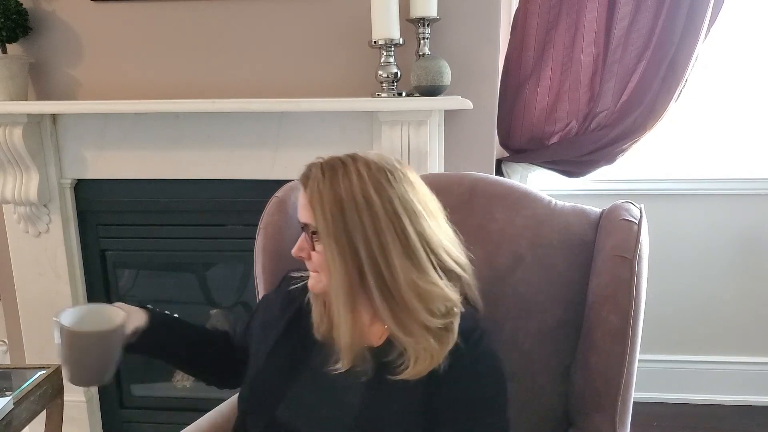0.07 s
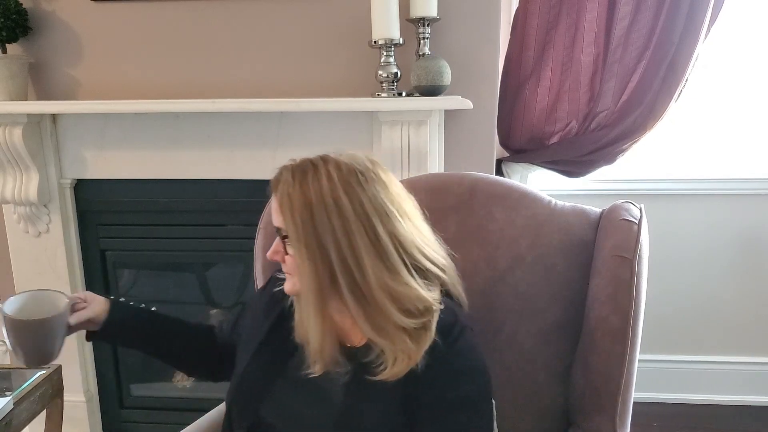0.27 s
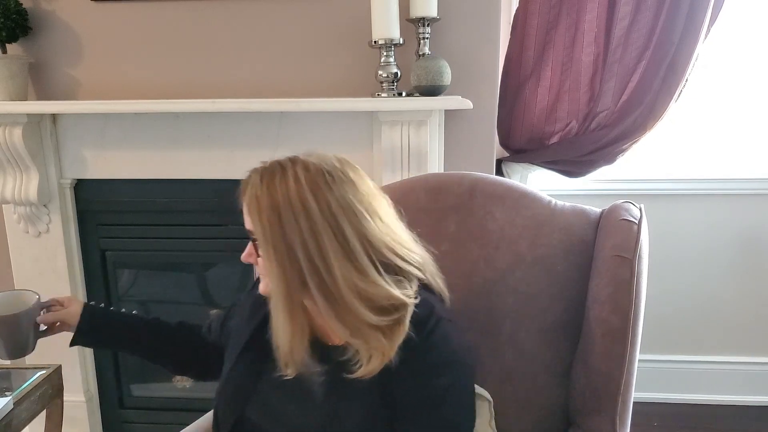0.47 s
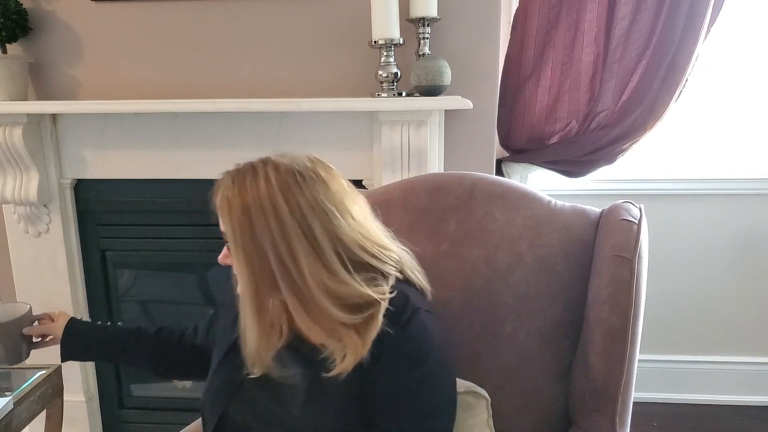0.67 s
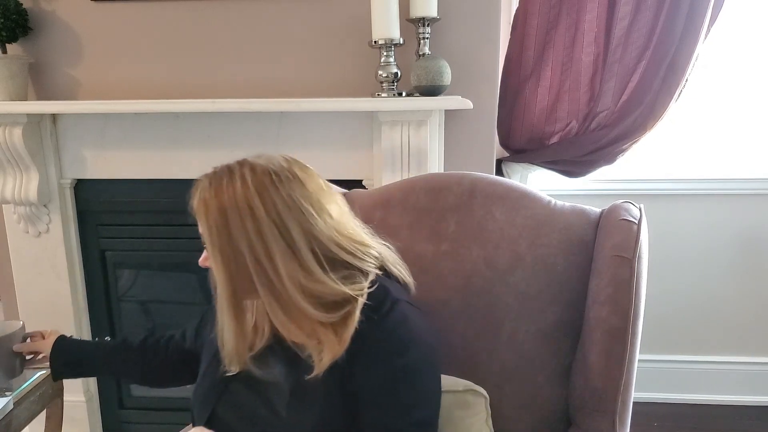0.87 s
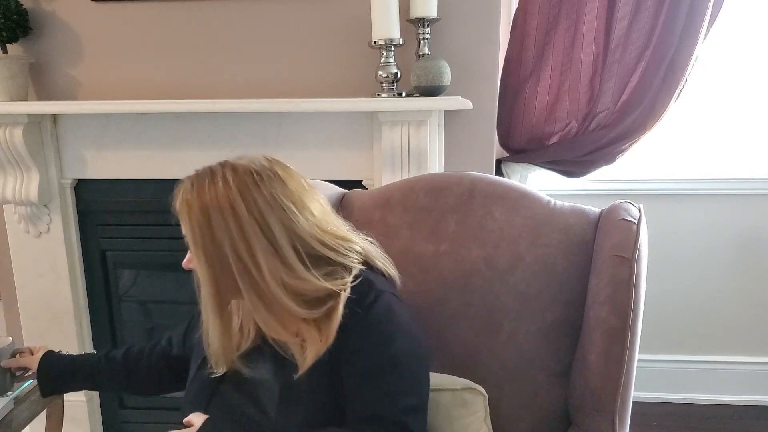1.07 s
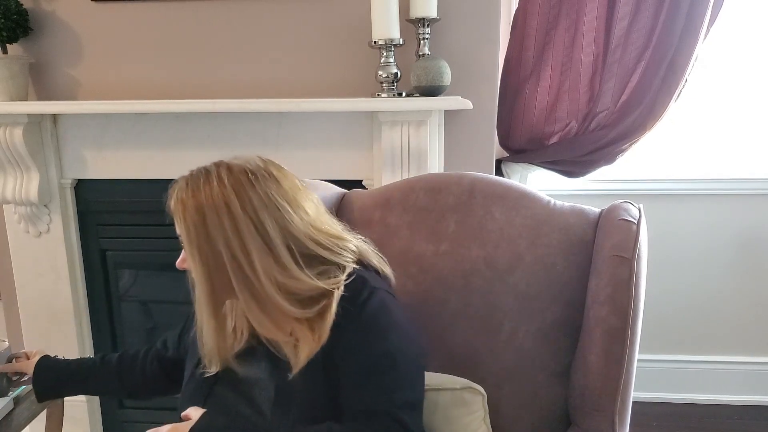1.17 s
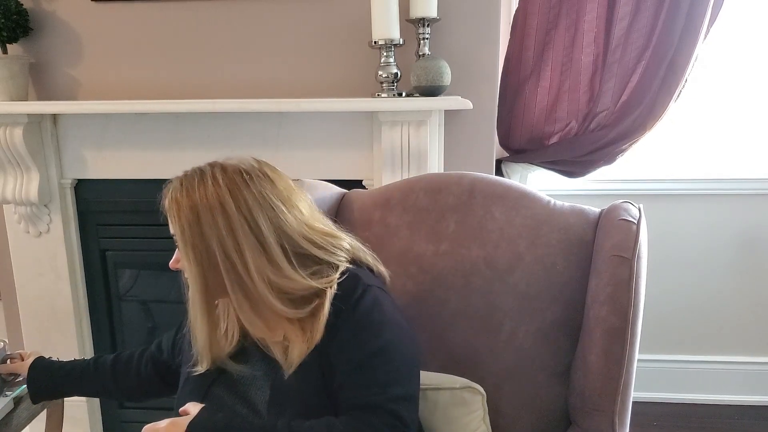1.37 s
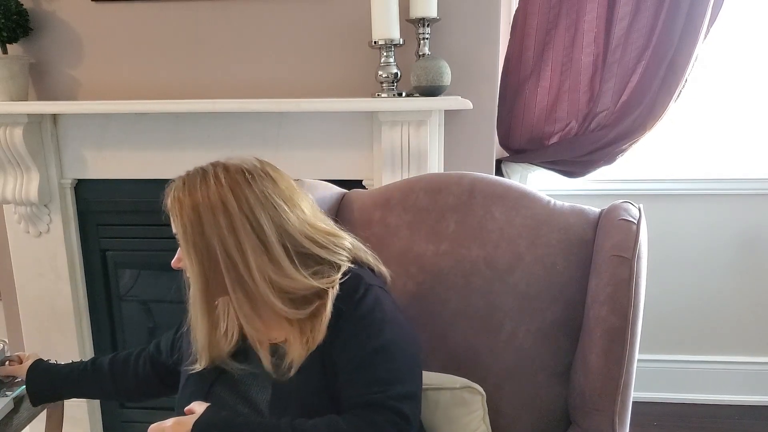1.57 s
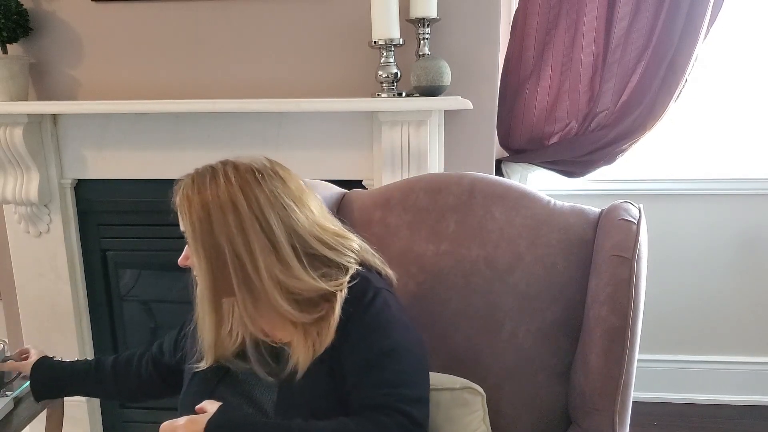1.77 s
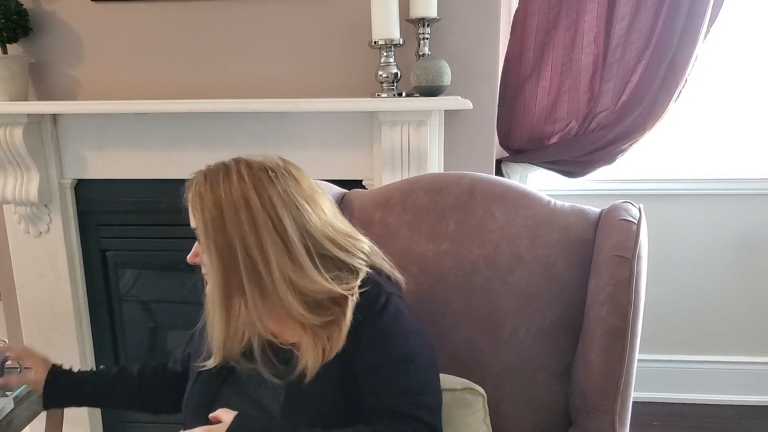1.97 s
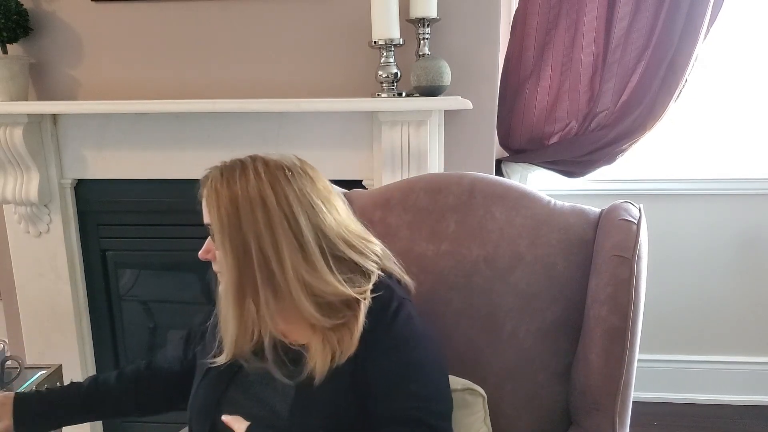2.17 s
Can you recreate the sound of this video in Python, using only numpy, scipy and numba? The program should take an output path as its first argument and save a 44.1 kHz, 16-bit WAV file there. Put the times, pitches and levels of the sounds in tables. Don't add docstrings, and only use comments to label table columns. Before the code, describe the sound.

A ceramic mug is set down on a glass table, one sharp knock then a softer one

```python
import sys
import numpy as np
from scipy import signal
from scipy.fft import rfft, irfft
from scipy.io import wavfile
from scipy.ndimage import uniform_filter1d
from numba import njit

SR = 44100
rng = np.random.default_rng(int(sys.argv[2]) if len(sys.argv) > 2 else 0)


def amplitude_ratio(level_db):
    exponent = np.asarray(level_db, float) / 20
    return 10 ** exponent


def digitize_waveform(pressure):
    field = np.atleast_2d(pressure).T
    bounded = np.clip(field, -1, 1)
    quanta = np.round(bounded * 32767).astype(np.int16)
    wavfile.write(sys.argv[1], SR, quanta)


N = 97152

# t/s, level/dB, crack tilt/(dB/octave), room fill time/s, decay factor/1
LANDINGS = [
    (1.2144, -3.5, 2, 0.04, 1.094),
    (1.6259, -17, 0.5, 0.031, 1.01),
]
# f/Hz, level/dB, T60/s
FIRST_MODES = [(477.6, -4, 0.74), (736, -12, 0.2), (881, -16, .35), (1162, -3.5, 0.37), (1305, -12.5, .6),
               (1687, -22, 0.19), (1920, -12.5, 0.3), (1990, -0.5, 0.31), (2314, -4.5, 0.31),
               (2563, -11.5, 0.26), (2930, -10, .25), (3239, -11, 0.33), (3340, -17.5, .28),
               (4176, -13.5, 0.47)]
# f/Hz, level/dB, T60/s
SECOND_MODES = [(497, 3.5, 0.47), (875, -7, 0.56), (1017, -1, 0.4), (1274, -7, 0.61), (1606, -15, 0.52),
                (1895, -4, 0.43), (2027, -7.5, 0.41), (2300, -8, .3), (2988, -27, 0.18), (3290, -16, 0.27),
                (3620, -7, .23), (4430, -18, 0.41), (6072, -20, 0.35)]
RING_LEVELS_DB = [-6.5, -8.5]
CLACK_LEVELS_DB = [-1, -6]
# f/Hz, level/dB, T60/s
CLACK_MODES = [(694, -6, 0.055), (1950, -11, .03), (2830, -3, .045), (3500, -9.5, 0.044),
               (5454, -14, 0.055), (9400, -31.5, .05), (11600, -34, .08), (12700, -36.5, .07)]
# f/Hz, level/dB, T60/s
THUD_MODES = [(50, -29, 0.74), (70.7, -16.5, 0.49), (172.2, -14.5, 0.38), (211.5, -18, 0.4),
              (365.3, -12, 0.43)]
# f/Hz, density/(dB per Hz)
CRACK_SPECTRUM = [(35, -46), (75, -16.5), (110, -22), (216, -13.5), (489, -5.5), (1400, -14.5),
                  (3100, -13.5), (6000, -33), (12500, -50), (15800, -77)]
# f/Hz, T60/s
ROOM_DECAY = [(100, 0.69), (500, 0.47), (1500, 0.53), (3500, 0.35), (7000, 0.31), (14000, 0.25)]
# delay/s, level/dB, left-right/dB
REFLECTIONS = [
    (0, -3, -5.5),
    (.0045, -13, 17.5),
    (.011, -15.5, 1),
    (.024, -19.5, -13.5),
]
# f/Hz, correlation/1
PORT_COHERENCE = [(60, 0.8), (150, 0.84), (300, .7), (600, 0.5), (1200, -.1), (3000, 0), (15000, 0)]
# t/s, level/dB, f/Hz, T60/s
RUSTLES = [
    (0, -67, 3500, 0.67),
    (.508, -64, 4200, 0.035),
]
# t/s, level/dB
DRONE_LEVEL = [
    (0, -62),
    (.15, -60),
    (.45, -70),
    (.65, -64.5),
    (.8, -93),
    (1.2, -92),
    (2.2, -94.5),
]
# f/Hz, width/Hz, level/dB
DRONE_RESONANCES = [(263, 91, -13), (458, 92, 4), (528, 90, 9), (730, 100, -1.5)]
# f/Hz, density/(dB per Hz)
HOUSE_SPECTRUM = [(20, -23), (70, -1), (215, -7.5), (560, -12.5), (900, -23), (1500, -24.5), (5500, -32.5),
                  (15800, -37)]
# t/s, level/dB
HOUSE_LEVEL = [
    (0, 1),
    (.8, 1.5),
    (1.2, -1),
    (1.9, -0.5),
    (2.2, -4),
]
# f/Hz, start t/s, level/dB
APPLIANCE_TONE = (850, 1.75, -73)

CONTACT_S = 0.0011
LEFT_RIGHT = np.array([[.5], [-.5]])


def knock(tilt_db_per_octave, fill_s, decay_factor, modes, ring_db, clack_db):
    port_lag_s, early_t60_s, early_db = 0.00024, .02, -4
    thud_late_s, sag_db_per_s2 = 0.04, 59
    t = np.arange(SR) / SR
    port_t = np.array([t, t - port_lag_s])
    early = 0
    for delay_s, db, pan_db in REFLECTIONS:
        early = early + amplitude_ratio(db + pan_db * LEFT_RIGHT) * fade(port_t - delay_s, early_t60_s)
    early = amplitude_ratio(early_db) * early

    noise_bands = list(bands(SR, CRACK_SPECTRUM))
    rms = np.sqrt(np.mean(sum(noise for _, noise in noise_bands) ** 2))
    crack = 0
    for hz, noise in noise_bands:
        tail = (1 - np.exp(-t / fill_s)) * fade(t, decay_factor * curve(hz, ROOM_DECAY))
        envelope = tail + early * min(hz / 700, 1)
        crack = crack + amplitude_ratio(tilt_db_per_octave * np.log2(hz / 1000)) * noise / rms * envelope
    crack = crack * (1 - np.exp(-t / CONTACT_S))

    ring = amplitude_ratio(ring_db) * rings(t, modes, rise_s=0.017, spread_rad=1.44)
    thud = rings(t, THUD_MODES, rise_s=0.036, spread_rad=.2)
    thud = thud * (1 - np.exp(-(t / thud_late_s) ** 2))
    return (crack + ring + thud) * amplitude_ratio(-sag_db_per_s2 * t ** 2) + amplitude_ratio(clack_db) * clack(port_t)


def clack(port_t):
    partials = 0
    for hz, db, t60_s in CLACK_MODES:
        partials = partials + amplitude_ratio(db) * fade(port_t, t60_s) * np.sin(2 * np.pi * hz * port_t)
    return partials * (1 - np.exp(-np.maximum(port_t, 0) / CONTACT_S))


def rings(t, modes, rise_s, spread_rad):
    wobble_db = 2
    out = 0
    for hz, db, t60_s in modes:
        phase = 2 * np.pi * rng.random() + spread_rad * rng.standard_normal() * LEFT_RIGHT
        envelope = amplitude_ratio(db + wobble_db * walk(25, len(t))) * fade(t, t60_s)
        out = out + envelope * (1 - np.exp(-t / rise_s)) * np.sin(2 * np.pi * hz * t + phase)
    return out


def rustle(t):
    out = 0
    for start_s, db, hz, t60_s in RUSTLES:
        noise = band(rng.standard_normal((2, N)), hz, 1.1 * hz)
        out = out + level(noise, db) * fade(t - start_s, t60_s)
    return out


def drone(t):
    noise = irfft(pair(N), N)
    out = 0
    for hz, width_hz, db in DRONE_RESONANCES:
        peak = band(band(noise, hz, width_hz), hz, width_hz)
        out = out + level(peak, db) * amplitude_ratio(3 * walk(12, N))
    return level(out, 0) * amplitude_ratio(np.interp(t, *np.array(DRONE_LEVEL).T))


def house(t):
    sensor_hz, sensor_width_hz, sensor_db, house_db = 8750, 900, -21.5, -63
    hum = 0
    for hz, noise in bands(N, HOUSE_SPECTRUM):
        hum = hum + noise * amplitude_ratio(1.5 * min(300 / hz, 1) * walk(8, N))
    sensor = band(rng.standard_normal((2, N)), sensor_hz, sensor_width_hz)
    sensor = band(sensor, sensor_hz, sensor_width_hz)
    floor = level(level(hum, 0) + level(sensor, sensor_db), house_db)
    floor = floor * amplitude_ratio(np.interp(t, *np.array(HOUSE_LEVEL).T))

    hz, start_s, db = APPLIANCE_TONE
    tone = amplitude_ratio(db + 3.9 * walk(10.9, N)) * np.sin(2 * np.pi * hz * t)
    return floor + tone * np.clip((t - start_s) / .1, 0, 1)


def bands(size, spectrum):
    hz = np.fft.rfftfreq(size, 1 / SR)
    coloured = pair(size) * amplitude_ratio(curve(hz, spectrum))
    for k in range(20):
        offset = np.clip(2 * np.log2(np.maximum(hz, 1) / 25) - k, -1, 1)
        yield 25 * 2 ** (k / 2), irfft(coloured * np.cos(np.pi / 2 * offset) ** 2, size)


def pair(size):
    coherence = curve(np.fft.rfftfreq(size, 1 / SR), PORT_COHERENCE)
    mid, side = rfft(rng.standard_normal((2, size)))
    mid = mid * np.sqrt(1 + coherence)
    side = side * np.sqrt(1 - coherence)
    return np.array([mid + side, mid - side]) / np.sqrt(2)


def band(x, hz, width_hz):
    return signal.lfilter(*signal.iirpeak(hz, hz / width_hz, fs=SR), x)


def curve(hz, table):
    table = np.array(table)
    return np.interp(np.log(np.maximum(hz, 1)), np.log(table[:, 0]), table[:, 1])


def level(x, db):
    return x * amplitude_ratio(db) / np.sqrt(np.mean(x ** 2))


def fade(t, t60_s):
    return (t >= 0) * amplitude_ratio(-60 * np.maximum(t, 0) / t60_s)


def walk(rate_hz, size):
    hold = int(SR / rate_hz)
    steps = np.repeat(rng.standard_normal(size // hold + 1), hold)
    return 1.2 * uniform_filter1d(uniform_filter1d(steps, hold), hold)[:size]


def scene():
    left_db = 0.7
    t = np.arange(N) / SR
    out = house(t) + drone(t) + rustle(t)
    mode_sets = (FIRST_MODES, SECOND_MODES)
    for landing, modes, ring_db, clack_db in zip(LANDINGS, mode_sets, RING_LEVELS_DB, CLACK_LEVELS_DB):
        start_s, db, tilt_db_per_octave, fill_s, decay_factor = landing
        i = int(start_s * SR)
        sound = knock(tilt_db_per_octave, fill_s, decay_factor, modes, ring_db, clack_db)
        out[:, i:i + SR] += amplitude_ratio(db) * sound[:, :N - i]
    return out * amplitude_ratio(left_db * LEFT_RIGHT)


@njit
def follow(x, up, down):
    e, out = 1e-6, np.empty(len(x))
    for i in range(len(x)):
        e += (x[i] - e) * (up if x[i] > e else down)
        out[i] = e
    return out


def band_limit(x):
    return signal.sosfilt(signal.butter(12, 15990, fs=SR, output="sos"), x)


def record(dry):
    limit_db, ratio, attack_s, release_s = -14.5, 1.3, 0.0027, 0.053
    envelope = follow(np.abs(dry).max(axis=0), 1 / (attack_s * SR), 1 / (release_s * SR))
    gain = np.minimum(amplitude_ratio(limit_db) / envelope, 1) ** (1 - 1 / ratio)
    mix = dry * gain * amplitude_ratio(-0.5)
    return band_limit(mix)


dry = scene()
out = record(dry)
digitize_waveform(out)
```